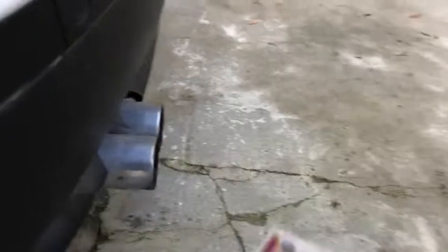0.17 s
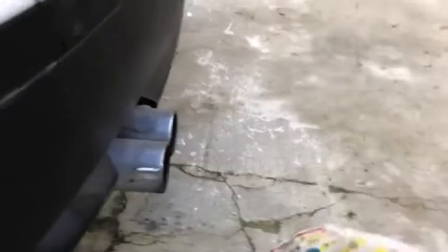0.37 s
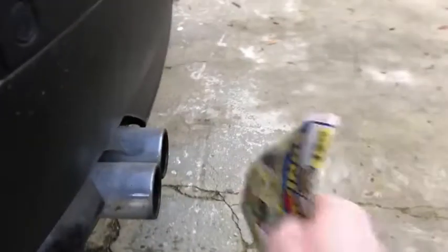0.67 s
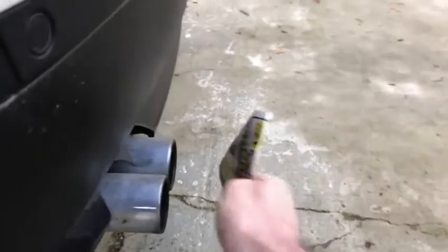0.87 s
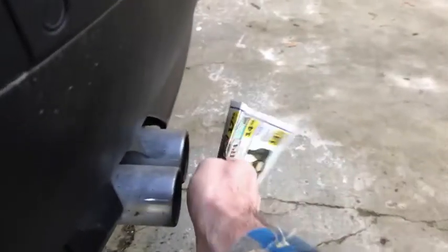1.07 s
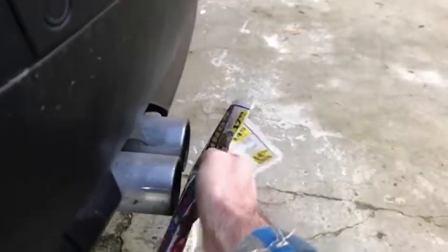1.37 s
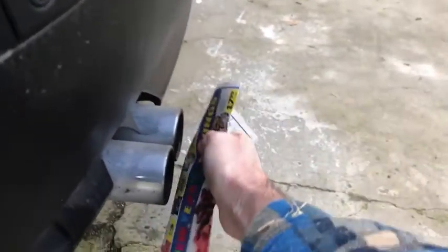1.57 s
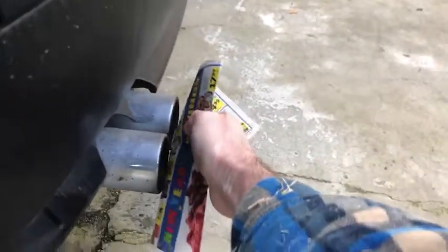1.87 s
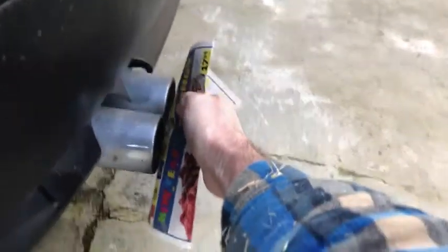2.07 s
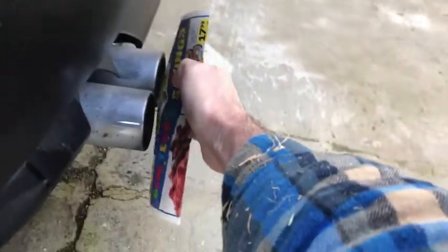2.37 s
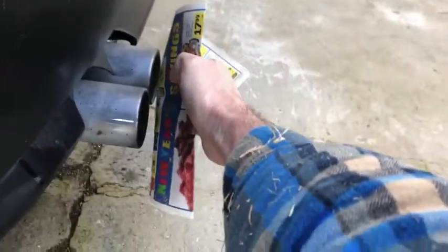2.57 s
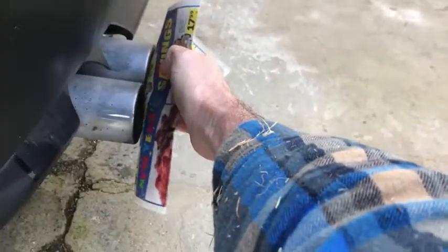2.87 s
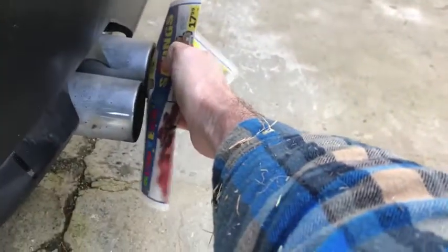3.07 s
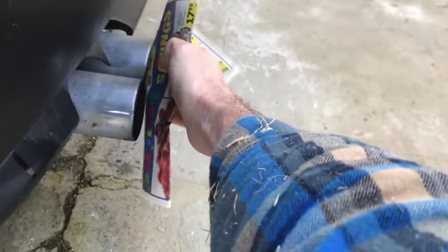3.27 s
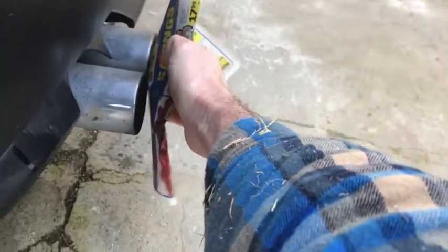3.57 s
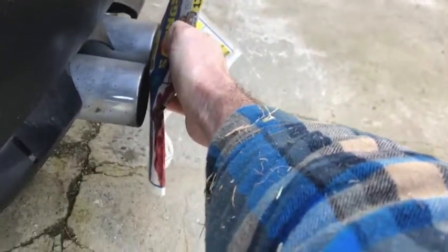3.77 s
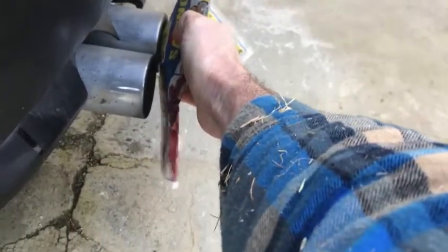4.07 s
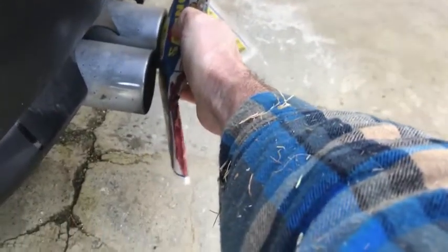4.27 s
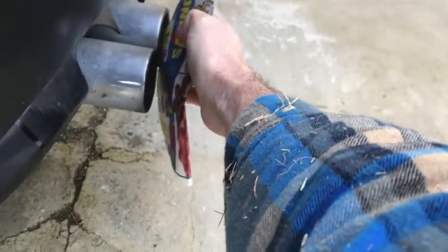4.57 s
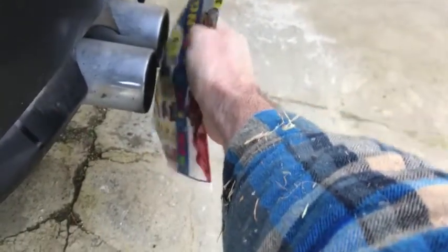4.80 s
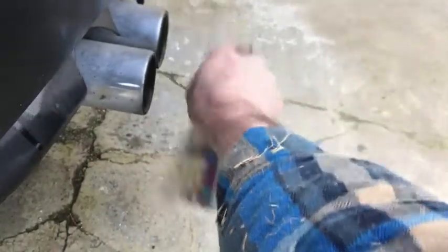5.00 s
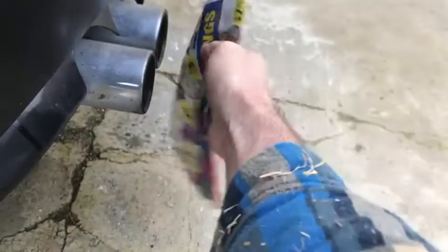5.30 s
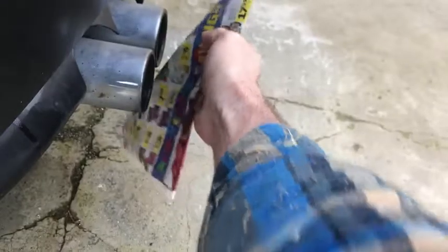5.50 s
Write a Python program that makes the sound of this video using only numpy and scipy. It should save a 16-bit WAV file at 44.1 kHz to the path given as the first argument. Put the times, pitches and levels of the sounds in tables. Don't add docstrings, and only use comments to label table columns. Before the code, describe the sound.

Deep uneven exhaust burble from an idling car, hissing gas and faint metallic ticking, with brief papery knocks and crackles at the start and around two seconds.

```python
import sys
import numpy as np
from scipy import signal
from scipy.fft import rfft, irfft, next_fast_len
from scipy.io import wavfile
from scipy.ndimage import uniform_filter1d, map_coordinates

SR = 44100
rng = np.random.default_rng(int(sys.argv[2]) if len(sys.argv) > 2 else 0)


def generate_wav(signal):
    frames = np.transpose(np.atleast_2d(signal))
    scaled = np.clip(frames, -1, 1) * 32767
    pcm = np.round(scaled).astype(np.int16)
    wavfile.write(sys.argv[1], SR, pcm)


def boost_factor(decibels):
    exponent = np.asarray(decibels, float) / 20
    return 10 ** exponent


N = 248724
LOOP = next_fast_len(N + SR)

FIRING_HZ = 69.33
MISFIRE_PLACE = 9.16
METAL_DB, METAL_GROWS = -54, 1.2
TAP_RISE_S, TAP_T60_S, SNAP_T60_S = .001, .009, .009

# time in seconds, lead over a steady idle in firings.
CRANK_WANDER = [(0.043, -0.007), (0.216, -0.022), (0.563, 0.101), (0.736, 0.02), (1.428, 0.19),
                (1.947, 0.063), (2.12, -0.012), (2.64, 0.008), (3.159, -0.092), (3.505, -0.066),
                (4.024, -0.065), (4.197, -0.163), (4.47, -0.209), (4.717, -0.174), (4.89, -0.204),
                (5.236, -0.065), (5.409, -0.152), (5.64, -0.207)]
CYLINDERS = [(0.946, 0.078), (1.179, 0.093), (1.05, 0.062), (0.943, 0.018), (0.882, 0.011), (0.978, 0.027),
             (1.071, 0.03), (1.144, 0.034), (1.097, 0.007), (1.071, -0.007), (0.861, 0.007), (0.78, 0.042)]
# frequency in Hz, width in Hz, gain as a ratio.
PIPE_MODES = [(68.0, 14.791, 0.311), (99.31, 8.0, 2.685), (143.248, 60.0, -0.503), (199.398, 8.0, 0.271),
              (272.026, 8.0, -0.036)]
# time in seconds, share of a full miss.
MISFIRES = [(-0.032, 1.15), (0.141, 1.02), (0.314, 0.08), (0.486, 0.18), (0.659, 0.86), (1.005, 0.9),
            (1.177, 0.14), (1.35, 0.13), (1.523, 0.8), (1.697, 0.57), (1.87, 0.45), (2.045, 0.09),
            (2.391, 0.91), (2.564, 0.45), (2.91, 0.08), (3.084, 1.0), (3.43, 1.08), (3.603, 0.1),
            (3.949, 0.84), (4.123, 0.86), (4.471, 0.19), (4.644, 0.08), (4.817, 0.49), (4.989, 0.14),
            (5.162, 0.39), (5.509, 0.35)]
# frequency in Hz, width in Hz, gain as a ratio.
BUMP_MODES = [(52.522, 10.952, 1.521), (90.019, 13.952, -2.997), (128.902, 28.534, -2.857)]
# time in seconds, exhaust level in dB.
LOAD = [
    (0.0, 0),
    (5.64, 0.5),
]
# place in firings, silencer level in dB, metal level in dB.
PUFFS = [(.25, -3, -2), (.75, -7.5, -8), (1.4, -6.5, -5), (2.25, -11.5, -8.5), (2.9, -4.5, -12.5),
         (3.4, -10, -13), (4.2, 2.5, -3.5), (5.2, -1, -6.5), (6.2, -5, -3.5), (7.2, -5, -12),
         (8.2, -3.5, -4.5), (9.2, -14.5, -17.5), (10.2, 2.5, 4), (11.15, 0, 0.5)]
# frequency in Hz, width in Hz, level in dB.
SILENCER_MODES = [(156.3, 14, 20), (193.6, 17, 17), (260, 12, 3.5), (346, 65, -7), (462, 45, -6.5),
                  (553, 22, 1), (647.6, 18, 3), (712, 82, -1), (836, 27, 2), (905, 60, -5.5)]
# frequency in Hz, width in Hz, level in dB.
METAL_MODES = [(1043, 100, -1.5), (1228, 33, 2.5), (1570, 55, 2.5), (1911, 54, -5), (2240, 36, 2),
               (2446, 60, -5), (3111, 97, -3.5), (3650, 380, -11.5), (3920, 390, -15.5), (4270, 69, -6.5)]
# time in seconds, level in dB.
NEARNESS = [
    (0.0, -52),
    (0.79, -53),
    (1.05, -50.5),
    (1.33, -53),
    (2.14, -50),
    (2.6, -51),
    (3.24, -49.5),
    (4.24, -50.5),
    (4.54, -48.5),
    (5.64, -50.5),
]
# place in firings, level in dB.
POPS = [
    (.35, -2.5),
    (2.4, -4.5),
    (4.33, -3),
    (5.3, -6.5),
    (8.3, -7.5),
    (10.3, 0),
    (11.3, -4),
]
# time in seconds, peak level in dB, pitch in Hz.
TAPS = [(0.0347, -29, 1400), (0.0543, -21, 1400), (0.0927, -37, 1900), (0.1351, -21, 1435),
        (0.1531, -25, 1500), (0.168, -25, 1416), (0.2049, -33.5, 1620), (0.238, -34, 1800),
        (0.2783, -35, 1750), (0.4594, -39, 1630), (0.5297, -28, 2700), (0.534, -29, 1300),
        (0.541, -26, 1250), (1.9837, -33, 1250), (1.9984, -36, 1190), (2.029, -34, 2600),
        (2.043, -37, 4200), (2.046, -37, 1150), (2.085, -39, 1900), (2.1011, -33, 1400), (2.143, -40, 1150),
        (2.158, -36, 1155), (2.373, -37, 1200), (2.402, -40, 1700), (2.413, -38.5, 2260),
        (4.1474, -43, 1900), (4.2911, -39.5, 1270), (5.1577, -42, 2280)]
# time in seconds, level in dB, centre in Hz.
SNAPS = [(0.035, -52, 3600), (0.055, -48, 3500), (0.093, -50, 4000), (0.12, -48, 9000),
         (0.132, -43.5, 8000), (0.169, -47, 5000), (0.2302, -44, 14000), (0.2378, -47, 4000),
         (0.279, -41, 14000), (0.4594, -51, 12000), (0.4678, -48, 11000), (0.5257, -44, 11000),
         (0.551, -44, 13000), (1.4027, -49.5, 5000), (1.4314, -49.5, 5000), (1.9837, -48, 4500),
         (1.9984, -51, 3500), (2.0274, -41, 3400), (2.0404, -42, 3500), (2.085, -48, 3300),
         (2.1011, -51, 3500), (2.143, -57, 8000), (2.158, -48, 3500), (2.3309, -53, 9000),
         (2.373, -48, 7000), (2.3874, -51, 10000), (2.413, -49, 3200), (5.0794, -50, 10000),
         (5.1577, -46, 3500), (5.2094, -52, 5000)]
# peak time in seconds, level in dB, crackle over body in dB,
# time to build 20 dB in seconds, time to fade 20 dB in seconds.
RUSTLES = [(0.037, -44, -14, .01, .04), (0.09, -52, -8, .25, .2), (0.15, -42, -6, .06, .19),
           (0.24, -52, -1, .03, .04), (0.282, -58, 7, .03, .03), (0.33, -47, -8.5, .17, .15),
           (0.49, -49, -5, .15, .08), (0.532, -36, -9, .05, .04), (0.549, -34, -8, .05, .022),
           (0.585, -49, -15, .05, .04), (0.95, -56, -10, 1.3, .7), (1.41, -54, -12, .02, .05),
           (2.034, -47, -10, .08, .03), (2.048, -49, -9, .02, .02), (2.102, -45, -16, .03, .03),
           (2.15, -56, -6, .01, .12), (2.2, -56, -20, 1.2, .9), (2.39, -62, 3, .1, .05),
           (2.41, -49, -16, .03, .035), (4.888, -57, -9.5, .2, .4), (5.075, -60, 2.5, .07, .035),
           (5.208, -55, -4, .04, .06), (5.36, -58, -4.5, .12, .06), (5.555, -52, -11, .2, .12)]
# frequency in Hz, density in dB per Hz.
PAPER_COLOUR = [(410, -45.5), (700, -16.5), (794, -15.5), (1230, 0.5), (2190, -2.5), (2870, -2),
                (6000, -22.5), (7800, -52.5), (13200, -120)]
# frequency in Hz, density in dB per Hz.
CRACKLE_COLOUR = [(2350, -24.5), (4000, -4), (7880, -11), (9220, -8.5), (10500, -11.5), (15100, -11.5),
                  (16000, -20.5)]
# frequency in Hz, density in dB per Hz.
GAS_COLOUR = [(150, -34), (250, -1), (458, -13), (656, -5), (840, -11.5), (1360, -22), (2260, -25),
              (2820, -25.5), (4240, -28.5), (4800, -41), (6240, -69), (10600, -120)]
# frequency in Hz, density in dB per Hz.
AIR_COLOUR = [(2710, -29.5), (4600, -1.5), (4820, -10), (5510, -2), (6010, -5.5), (7570, -9.5),
              (9020, -7.5), (10500, -9.5), (12700, -4), (14100, -13), (15700, -12)]
# frequency in Hz, density in dB per Hz.
RUMBLE_COLOUR = [(20, -51.5), (30, -13.5), (45, -3), (56, -3), (70, -60.5)]


def exhaust():
    load_db = curves(LOAD)[0] + .25 * wobble(8)
    return SR / (2 * FIRING_HZ) * boost_factor(load_db) * (firings() + misfires())


def firings():
    size, late = np.transpose(CYLINDERS)
    s = moments(np.arange(len(size)) + late)
    fired = pulses(s, size * boost_factor(.12 * rng.standard_normal(s.shape)))
    pipe = lambda f: ringing(PIPE_MODES, .0023)(f) * muffled(f)
    second = filtered(fired, lambda f: pipe(f) * np.exp(-((f - 2 * FIRING_HZ) / 25) ** 2))
    turned = FIRING_HZ * np.arange(N) / SR + curves(CRANK_WANDER)[0]
    swell_db = 1.5 * np.cos(2 * np.pi * (turned - 1.95) / 6) - .5
    return filtered(fired, pipe) + second * (boost_factor(swell_db) - 1)


def misfires():
    when, share = np.transpose(MISFIRES)
    turns = moments([MISFIRE_PLACE])
    s = turns[np.abs(turns - when).argmin(0), 0]
    bump = lambda f: ringing(BUMP_MODES, .0043)(f) * np.exp(-(f / 200) ** 4) * muffled(f)
    return filtered(pulses(s, share), bump)


def valves():
    place, puff_db, tick_db = np.transpose(PUFFS)
    s = moments(place)
    s = s + .00015 * rng.standard_normal(s.shape)
    shell_db = curves(NEARNESS)[0]
    metal_db = METAL_DB + METAL_GROWS * (shell_db - shell_db.mean())
    shell = struck(SILENCER_MODES, s, puff_db, scatter_db=2.5, gush_db=-3, steady_db=-1.5, gush_s=0.01, skirt=3)
    metal = struck(METAL_MODES, s, tick_db, scatter_db=5.0, gush_db=-1.0, steady_db=6, gush_s=0.004, skirt=6.9)
    return boost_factor(shell_db + 13.5) * shell + boost_factor(metal_db) * metal


def chamber():
    s = moments([6.1])
    mode = ringing([(401.6, 22, 1)], 0)
    kicks = pulses(s, boost_factor(1.0 * rng.standard_normal(s.shape)))
    return boost_factor(-58) * unit(filtered(kicks, lambda f: mode(f) ** 2))


def pops():
    place, db = np.transpose(POPS)
    s = moments(place - .15)
    tip = ringing([(772, 330, 1)], 0)
    kicks = pulses(s, boost_factor(db + 2.9 * rng.standard_normal(s.shape)))
    return boost_factor(curves(NEARNESS)[0] - 4.5) * unit(filtered(kicks, lambda f: tip(f) ** 3))


def paper_taps():
    out, t = np.zeros(N + SR), np.arange(SR // 40) / SR
    partials = [(1, 1), (1.55, 0.4), (.74, 0.55), (2.2, 0.15)]
    for s, db, hz in TAPS:
        ring = sum(gain * np.sin(2 * np.pi * ratio * hz * t) for ratio, gain in partials)
        rise = 1 - np.exp(-(t / TAP_RISE_S) ** 2)
        out[round(s * SR):][:len(t)] += boost_factor(db + 7 - 60 * t / TAP_T60_S) * rise * ring
    return out[:N]


def paper_snaps():
    out, t = np.zeros(N + SR), np.arange(SR // 40) / SR
    for s, db, hz in SNAPS:
        band = signal.butter(1, [hz * .6, min(hz * 1.6, SR * .4)], "bandpass", fs=SR)
        crack = unit(signal.lfilter(*band, rng.standard_normal(len(t))))
        out[round(s * SR):][:len(t)] += boost_factor(db + 3.5 - 60 * t / SNAP_T60_S) * crack
    return out[:N]


def paper_rustle():
    clumps = boost_factor(2.6 * wobble(500))
    body = coloured(clumps * rng.standard_normal(N), PAPER_COLOUR)
    crackle = coloured(clumps * rng.standard_normal(N), CRACKLE_COLOUR)
    t = np.arange(N) / SR
    body_power, crackle_power = np.zeros(N), np.zeros(N)
    for s, db, crackle_db, build, fade in RUSTLES:
        swell = boost_factor(db - 20 * np.where(t < s, (s - t) / build, (t - s) / fade))
        body_power += swell ** 2
        crackle_power += (boost_factor(crackle_db) * swell) ** 2
    return boost_factor(-2.5) * np.sqrt(body_power) * body + boost_factor(0.5) * np.sqrt(crackle_power) * crackle


def gas_stream():
    return boost_factor(-49) * coloured(patchy(0.78), GAS_COLOUR)


def body_rumble():
    return boost_factor(-45.5) * coloured(patchy(.1), RUMBLE_COLOUR)


def distant_air():
    return boost_factor(-65) * coloured(patchy(1.8), AIR_COLOUR)


def moments(places):
    t = np.arange(-SR // 2, N + SR // 4) / SR
    turned = FIRING_HZ * t + np.interp(t, *np.transpose(CRANK_WANDER))
    cycles = np.arange(-2, int(FIRING_HZ * N / SR / len(CYLINDERS)) + 1)
    return np.interp(cycles[:, None] * len(CYLINDERS) + places, turned, t)


def pulses(s, size):
    return np.bincount(np.round(s * SR).astype(int).ravel() % LOOP, size.ravel(), LOOP)


def ringing(modes, soft_s):
    def response(f):
        rung = sum(g * 1j * f * w / (c * c - f * f + 1j * f * w) for c, w, g in modes)
        return rung / (1 + 2j * np.pi * f * soft_s) ** 2
    return response


def muffled(f):
    high, low = 1j * f / 300, 1j * f / 40
    return low ** 2 / (1 + 1.4 * low + low ** 2) / (1 + high + high ** 2) ** 3


def struck(modes, s, db, scatter_db, gush_db, steady_db, gush_s, skirt):
    out, f = 0, np.fft.rfftfreq(LOOP, 1 / SR)
    for k, (hz, width, mode_db) in enumerate(modes):
        mode = hz, width, (-1) ** k * boost_factor(mode_db)
        knocks = pulses(s, boost_factor(db + scatter_db * rng.standard_normal(s.shape)))[:N]
        gush = unit(signal.lfilter([1], [1, -np.exp(-1 / (gush_s * SR))], knocks))
        flow = boost_factor(gush_db) * gush + boost_factor(steady_db + 3.5 * wobble(25))
        drive = unit(knocks) + flow * rng.standard_normal(N)
        narrowed = 1 + ((f - hz) / (skirt * width)) ** 2
        out = out + rfft(drive, LOOP) * ringing([mode], 0)(f) / narrowed
    return unit(irfft(out, LOOP)[:N])


def patchy(depth_db):
    z = signal.stft(rng.standard_normal(N), nperseg=512)[2]
    field = uniform_filter1d(rng.standard_normal(z.shape), size=5, axis=0)
    field = uniform_filter1d(field, size=30, axis=1)
    return signal.istft(z * boost_factor(depth_db * unit(field)), nperseg=512)[1][:N]


def wobble(rate):
    coarse = np.arange(0, N + 16, 16)
    knots = rng.standard_normal(int(N * rate / SR) + 4)
    return np.interp(np.arange(N), coarse, map_coordinates(knots, [coarse * rate / SR]))


def curves(rows):
    s, *cols = np.transpose(rows)
    return [np.interp(np.arange(N) / SR, s, c) for c in cols]


def coloured(x, spectrum):
    f, db = np.transpose(spectrum)
    return unit(filtered(x, lambda hz: boost_factor(np.interp(np.log(hz + 1), np.log(f + 1), db))))


def filtered(x, response):
    return irfft(rfft(x, LOOP) * response(np.fft.rfftfreq(LOOP, 1 / SR)), LOOP)[:N]


def unit(x):
    return x / np.sqrt(np.mean(x ** 2) + 1e-20)


def scene():
    engine = exhaust() + valves() + chamber() + pops()
    paper = paper_taps() + paper_snaps() + paper_rustle()
    background = gas_stream() + body_rumble() + distant_air()
    return (engine + paper + background)[None]


def roll_off(x):
    return signal.sosfilt(signal.butter(12, 16720, fs=SR, output="sos"), x)


def record(dry):
    passed = filtered(dry[0], lambda f: (f < 15750) * f ** 4 / (f ** 4 + 26 ** 4))
    return roll_off(passed[None])


dry = scene()
out = record(dry)
generate_wav(out)
```